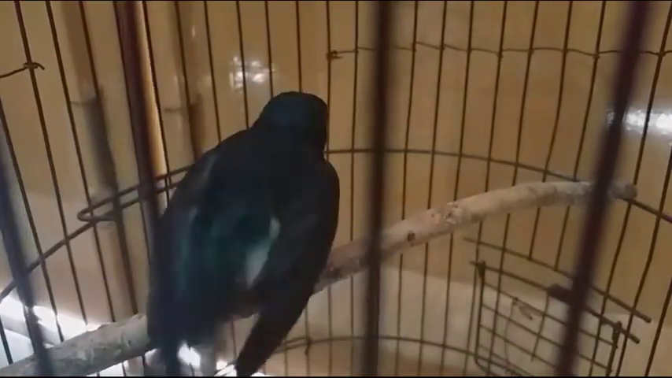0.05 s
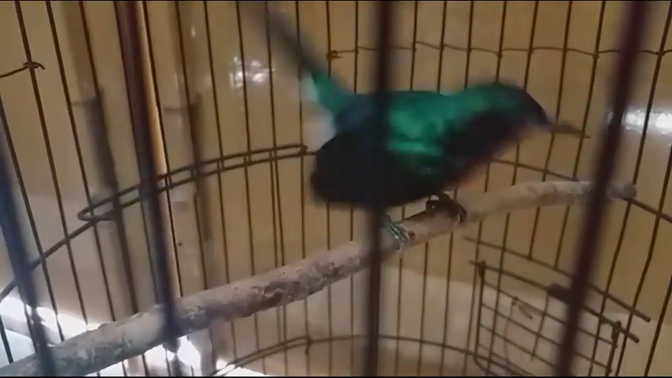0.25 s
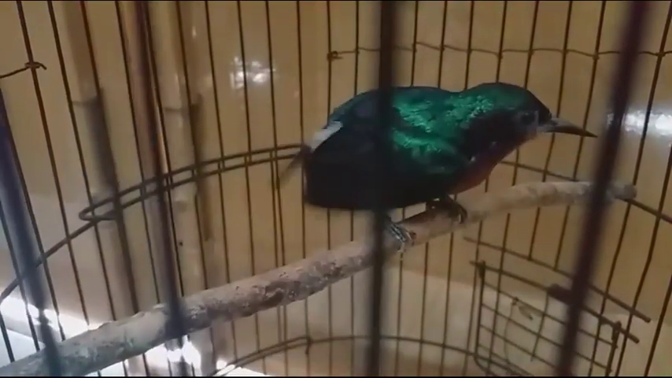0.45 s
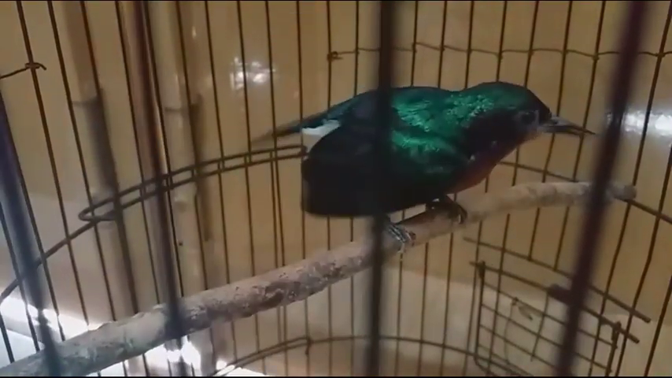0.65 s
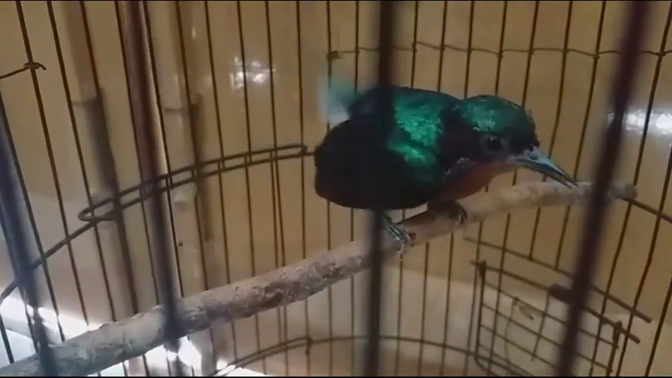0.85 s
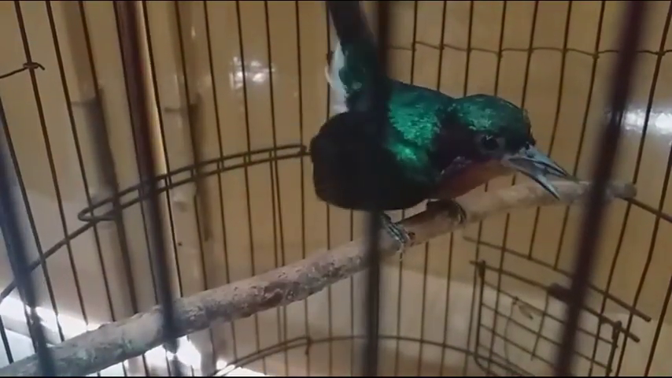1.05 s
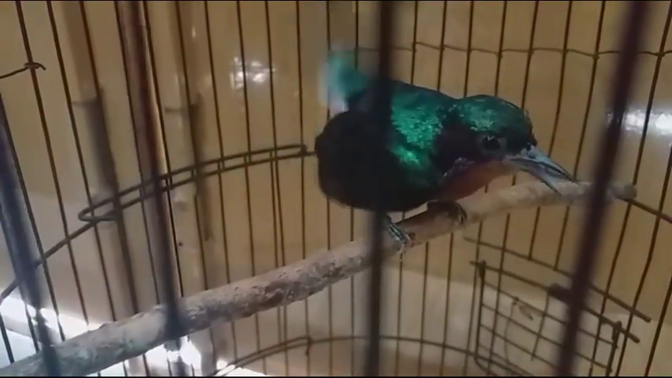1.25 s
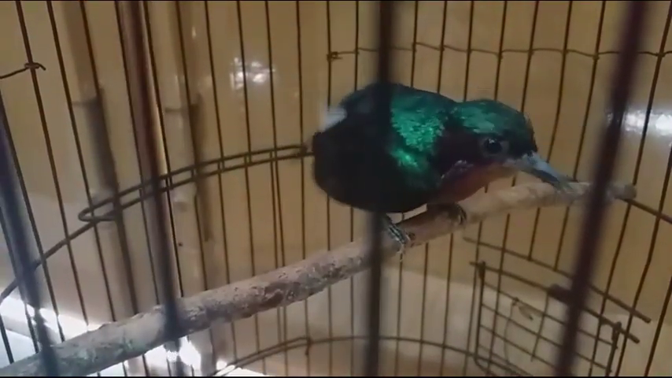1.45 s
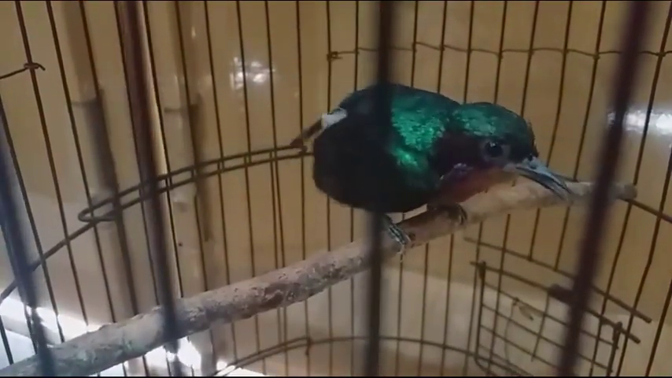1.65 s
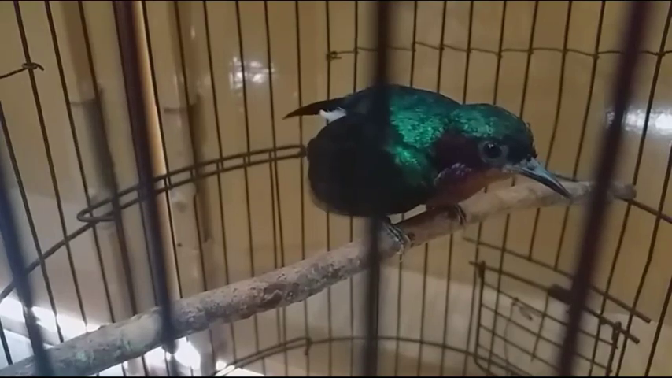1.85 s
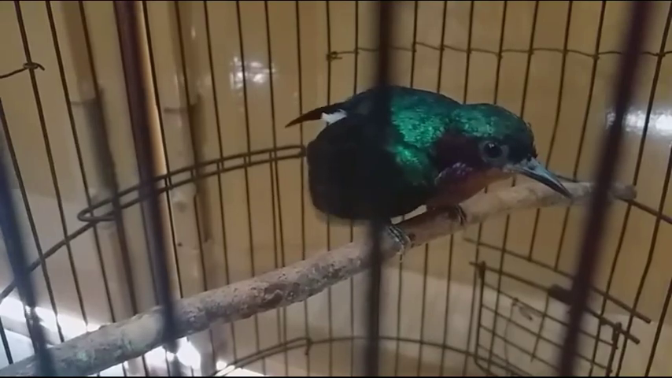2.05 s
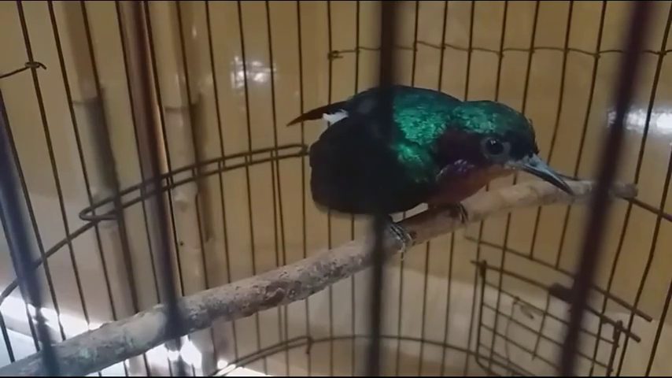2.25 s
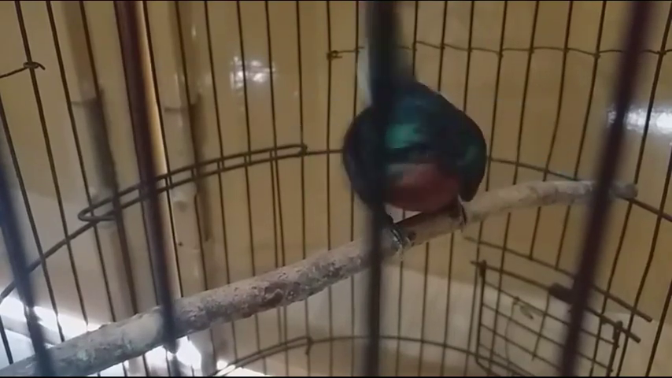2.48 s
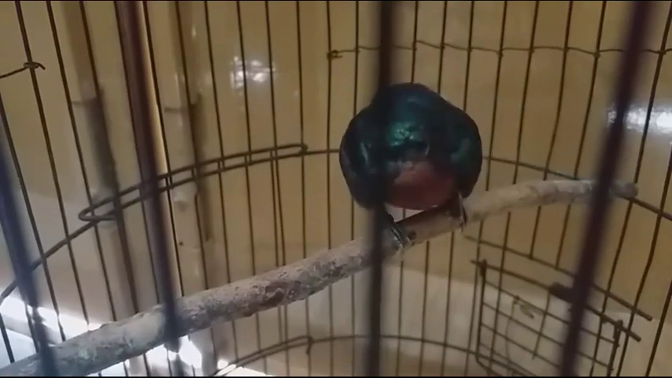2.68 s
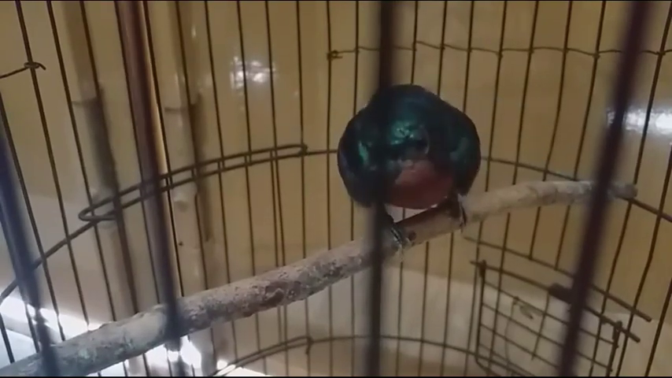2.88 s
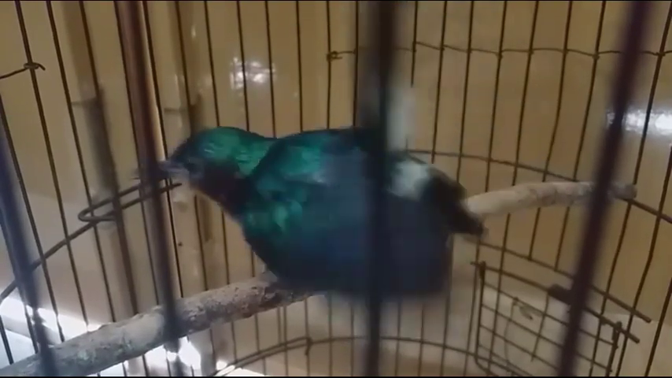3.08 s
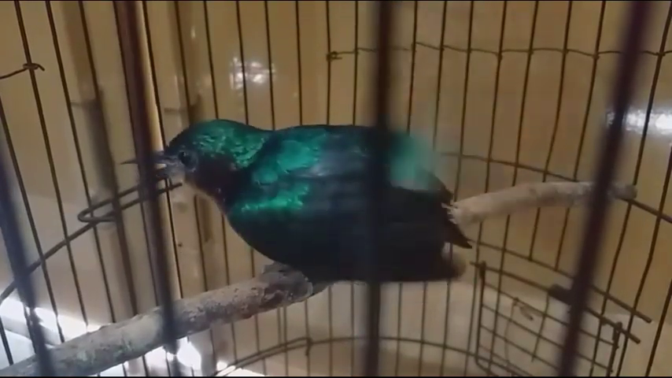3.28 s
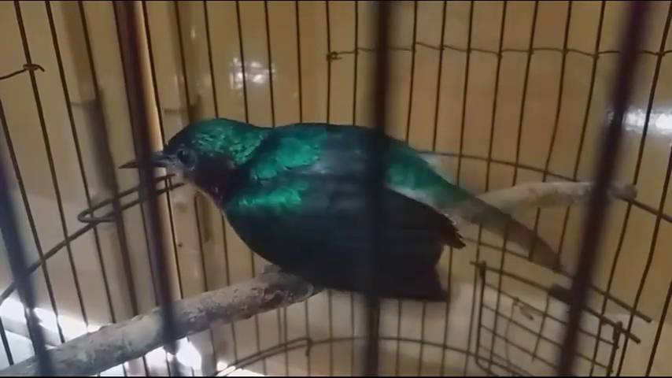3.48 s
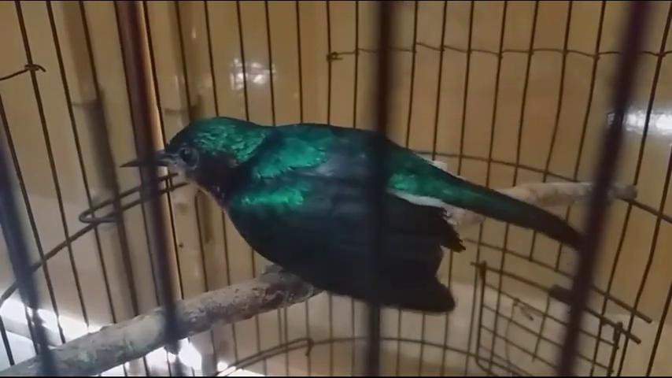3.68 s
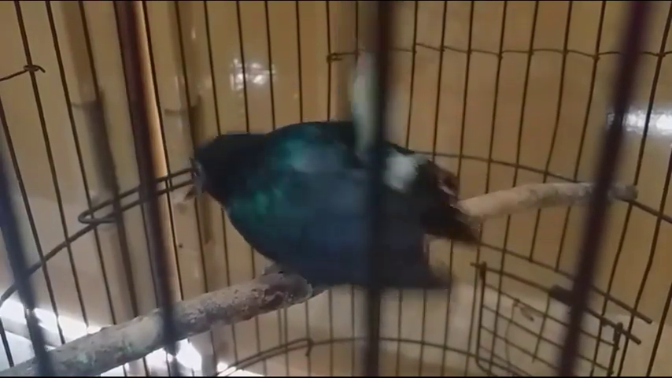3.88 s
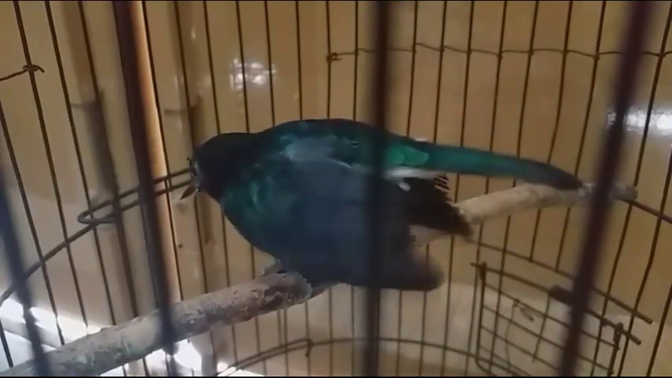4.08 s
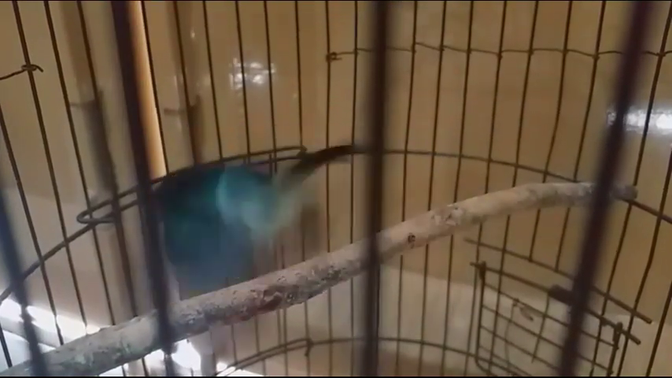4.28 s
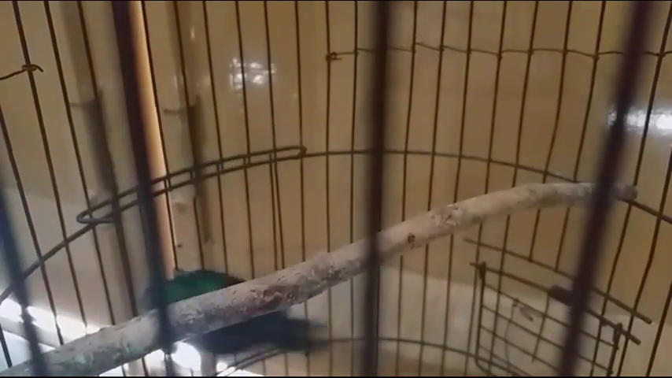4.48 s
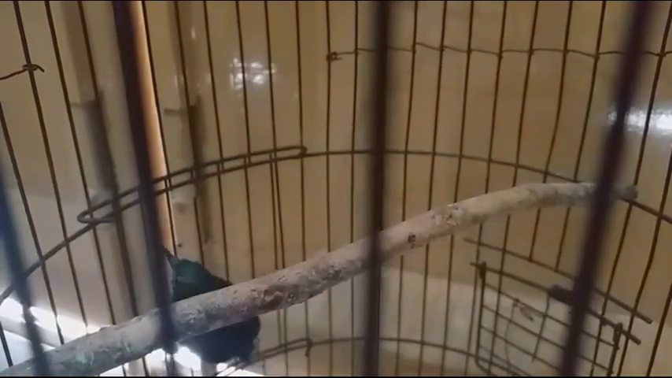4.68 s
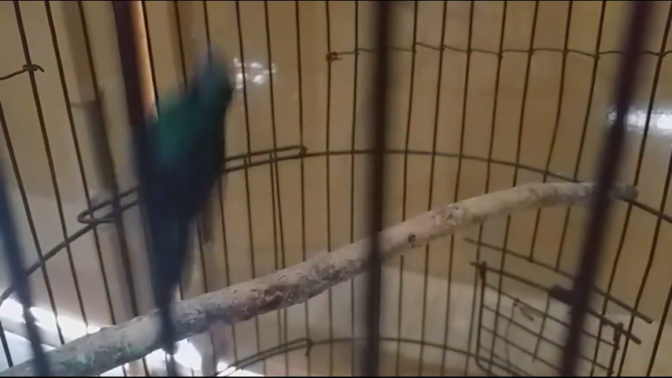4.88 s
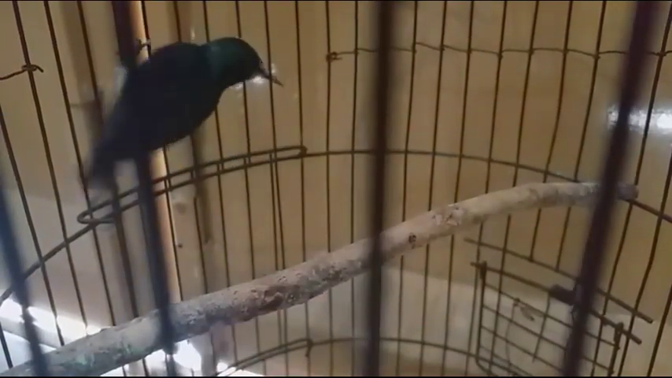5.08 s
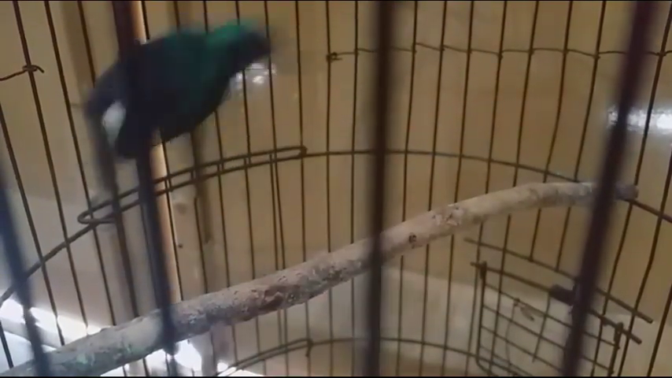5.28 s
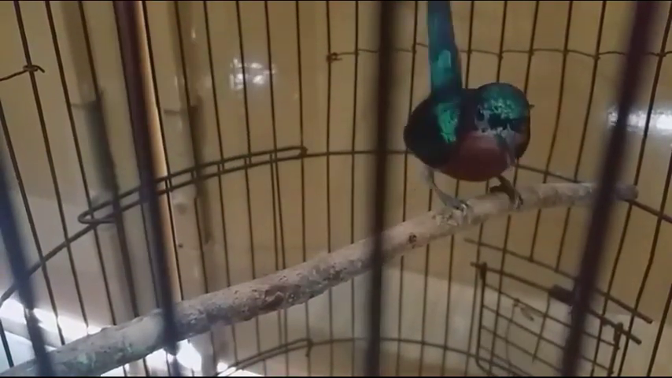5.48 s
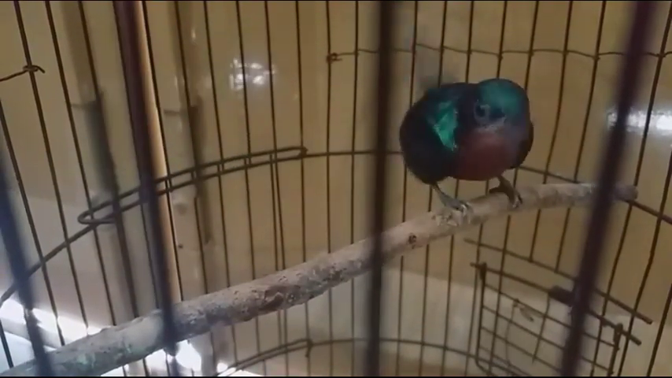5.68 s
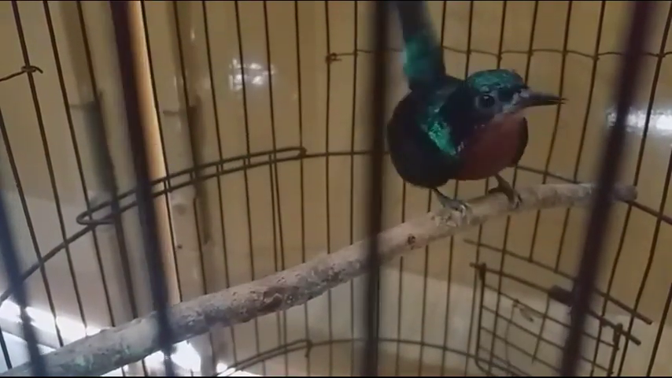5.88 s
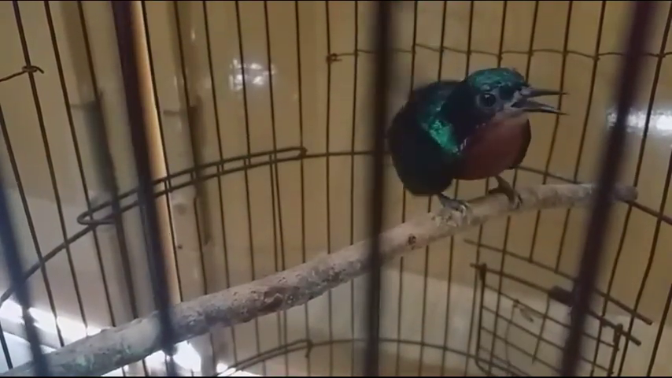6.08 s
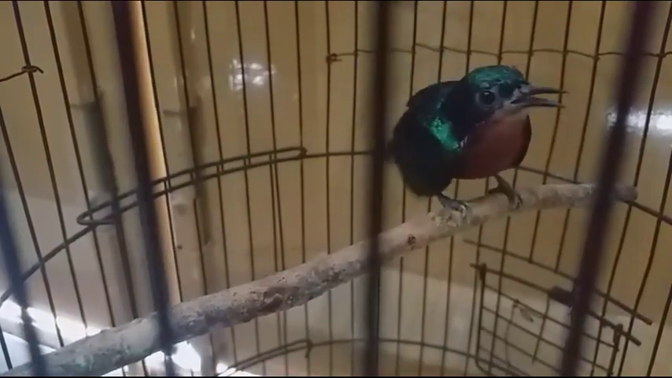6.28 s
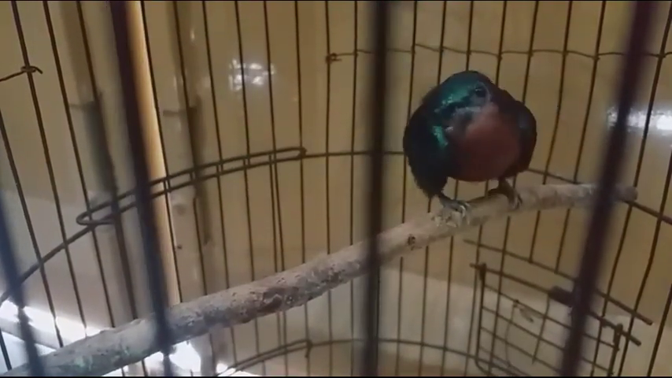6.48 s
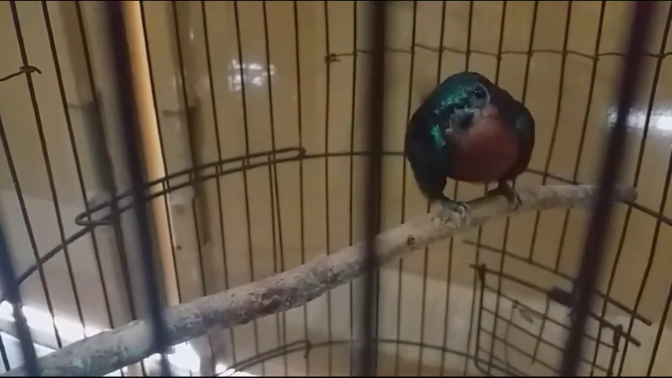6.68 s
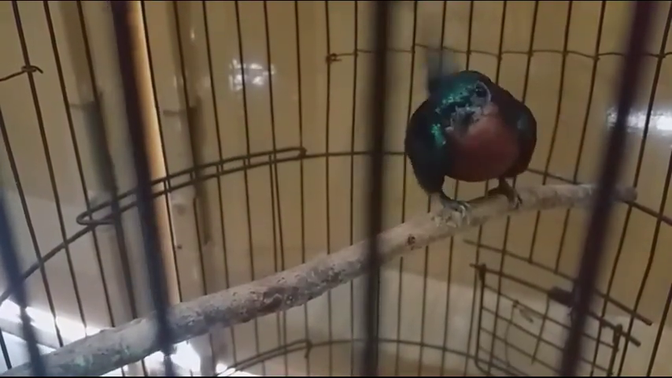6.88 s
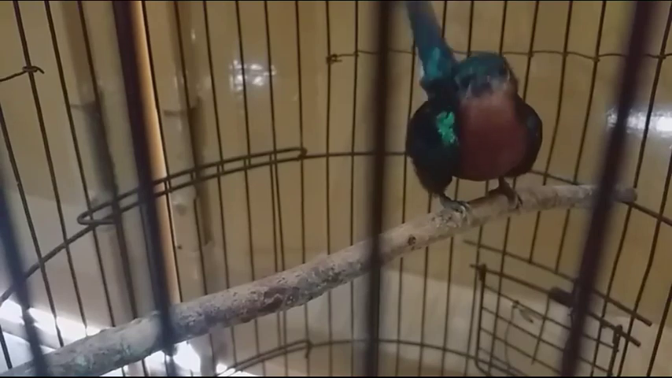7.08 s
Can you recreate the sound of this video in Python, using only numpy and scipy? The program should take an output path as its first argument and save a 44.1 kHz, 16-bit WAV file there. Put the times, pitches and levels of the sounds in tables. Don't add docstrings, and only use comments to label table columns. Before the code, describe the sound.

A small caged bird sings loud, piercing raspy up-chirps and fast falling whistles close up, ringing in a bare room, with claw ticks and wing flutter.

```python
import sys
import numpy as np
from scipy import signal
from scipy.fft import rfft, irfft
from scipy.io import wavfile
from scipy.ndimage import uniform_filter1d, map_coordinates

SR = 44100
rng = np.random.default_rng(int(sys.argv[2]) if len(sys.argv) > 2 else 0)


def wav_record(signal):
    frames = np.transpose(np.atleast_2d(signal))
    bounded = np.clip(frames, -1, 1)
    quanta = np.round(bounded * 32767).astype(np.int16)
    wavfile.write(sys.argv[1], SR, quanta)


def volts(x):
    e = np.asarray(x, float) / 20
    return 10 ** e


N = 314874
TIME = np.arange(N) / SR


def shape(hz, table):
    f, db = np.transpose(table)
    return volts(np.interp(np.log(np.maximum(hz, 1)), np.log(f), db))


def band(x, lo_hz, hi_hz):
    edges = [lo_hz, min(hi_hz, .45 * SR)]
    return signal.sosfilt(signal.butter(3, edges, "band", fs=SR, output="sos"), x)


def unit(x):
    return x / np.sqrt(np.mean(x ** 2))


def walk(rate):
    k = max(int(SR / rate), 1)
    steps = np.repeat(rng.standard_normal(N // k + 1), k)
    return unit(uniform_filter1d(uniform_filter1d(steps, k), k)[:N])


def coloured(table):
    spectrum = rfft(rng.standard_normal(N)) * shape(np.arange(N // 2 + 1) * SR / N, table)
    return unit(irfft(spectrum, N))


def curve(rows, edge_s):
    s, *columns = np.transpose(rows)
    gate = np.clip(np.minimum(TIME - s[0], s[-1] - TIME) / edge_s + 1, 0, 1)
    return gate, [uniform_filter1d(np.interp(TIME, s, c), size=60) for c in columns]


def fade(t, t60):
    return 1000 ** (-t / t60)


# t/s, rise/s, foot f/Hz, top f/Hz, peak level/dB
CHIRPS = [(-0.034, .041, 2600, 6580, -12), (0.748, .025, 4760, 7380, -12), (0.868, .032, 2957, 7370, -7.5),
          (0.963, .032, 2902, 7220, -9.5), (1.032, .044, 3090, 7440, -9.5), (2.983, .017, 4800, 7157, -5.5),
          (3.092, .034, 2938, 6984, -6.5), (3.198, .030, 2500, 7132, -6.5), (3.281, 0.032, 2460, 6516, -9),
          (3.345, .037, 2387, 6667, -9), (4.883, .026, 4700, 7690, -5), (5.422, .029, 4600, 7330, -8),
          (5.548, 0.028, 2752, 7073, -6), (5.652, 0.023, 2741, 7226, -4), (5.73, .032, 2543, 7043, -6.5),
          (5.79, .033, 2765, 6425, -6)]
RASP_DB = [-4.5, -10.5, 0.5, 0, -0.5, -6, 0.5, -0.5, 0.5, -5, -3.5, -1, 3.5, 0, -4, 6]
# t/s, level/dB
SURGES = [(0.033, 6.5), (1.144, 3), (1.279, 3.5), (1.345, 3.5), (1.489, 3.5), (1.72, 1.5), (3.432, 5.5),
          (3.448, 4), (5.896, 5), (6.04, 5), (6.065, 3.5), (6.254, 10.5), (6.495, 8.5), (6.696, 3),
          (6.753, 3)]


def sunbird():
    shiver, breath = walk(1500), band(coloured(THROAT), 3300, 13000)
    wander = 1 + .004 * walk(90)
    run_on_s, release_s, release_db = .035, .003, -18
    song, left = 0, whistles()
    for row, rasp_db in zip(CHIRPS, RASP_DB):
        start, rise = row[:2]
        joined = [w for w in left if 0 < w[0][0] - start - rise < run_on_s]
        left = [w for w in left if w not in joined]
        points = chirp(*row, bool(joined))
        s, hz, db = points[-1]
        ending = joined[0] if joined else [(s + release_s, hz, db + release_db)]
        song = song + note(sorted(points + ending), rasp_db, shiver, breath, wander)
    for points in left:
        song = song + note(points, -72, shiver, breath, wander)
    surge_s, flutter_db = 0.0038, 1.5
    surge_db = sum(db * np.exp(-((TIME - s) / surge_s) ** 2) for s, db in SURGES)
    return song * volts(flutter_db * np.minimum(walk(190), 1) + surge_db)


def chirp(s, rise, foot_hz, top_hz, db, runs_on):
    knee_hz, faster, round_hz, round_s = 4800, 1.6, 239.6, .004
    foot_db, attack_s, opener_hz = -26, .011, 4000
    low = max(knee_hz - foot_hz, 50)
    high = (top_hz - round_hz - knee_hz) / faster
    knee = (rise - round_s) * low / (low + high)
    hold, top_db = (.005, 0) if runs_on or foot_hz > opener_hz else (.001, -9)
    at = np.unique([0, knee, attack_s / 2, attack_s, rise - round_s, rise, rise + hold])
    bends_hz = [foot_hz, foot_hz + low, top_hz - round_hz, top_hz]
    hz = np.interp(at, [0, knee, rise - round_s, rise], bends_hz)
    size_db = db + np.interp(at, [0, attack_s, rise - round_s, rise + hold], [foot_db, 0, 0, top_db])
    return list(zip(s + at, hz, size_db))


STEP = [(0, .88), (.06, 1.12), (.17, .92), (.33, 1), (.41, .8), (.56, .13), (.64, .06), (.93, 0), (1, -.06)]
SLIDE = [(0, 1), (.16, .96), (.42, .56), (.52, .52), (.85, .1), (1, 0)]
HOOK = [(0, 1), (.12, .85), (.36, .15), (.47, 0), (.65, .2), (.85, .35), (1, .35)]
TIP = [(0, 0), (.16, .65), (.5, .6), (.85, .95), (1, 1)]
CLIMB = [(0, 0), (.1, .08), (.42, .8), (.56, 1), (.85, .98), (1, .9)]
SHAPE_DB = [
    [-9, 1, -1, -7, -3, -5.5, -1, -1, -2],
    [-18, -4, -3, -1, -1.5, -10.5],
    [-10, -2.5, 1.5, -8.5, 2.5, -1, -7.5],
    [-4, -4, 1.5, -4.5, -15.5],
    [-3, -2, 1.5, -0.5, -1, -4.5],
]
# t/s, length/s, high f/Hz, low f/Hz, peak level/dB
STEPS = [(6.342, .107, 6590, 5071, -5.5), (6.596, 0.11, 6250, 4857, -6.5)]
SLIDES = [(1.416, .05, 7330, 5857, -4.5), (6.133, .082, 7762, 5483, -4), (6.243, .025, 7840, 6600, -3),
          (6.485, .03, 7716, 6815, -5.5), (7.118, 0.035, 5466, 4670, -12.5)]
HOOKS = [(1.252, .041, 7210, 6492, -1.5), (6.742, .028, 7003, 6152, -6), (6.994, .036, 6123, 5620, -8),
         (7.098, .020, 5900, 5230, -7)]
TIPS = [(1.33, 0.023, 7816, 7040, -7.5), (1.477, 0.036, 6572, 6074, -3.5), (1.709, 0.022, 6286, 5804, -3.5)]
CLIMBS = [(0.017, .053, 7165, 6090, -6), (3.4, .059, 7425, 5540, -4), (5.845, .072, 7177, 4000, -5)]
# t/s, f/Hz, peak level/dB
DIVES = [
    [(1.085, 7200, -3.5), (1.097, 6680, -10), (1.12, 6670, 3.5), (1.135, 6578, -4.5), (1.159, 5960, -4),
     (1.17, 5790, -9.5), (1.194, 5897, -8), (1.207, 6010, -12.5)],
    [(1.58, 6600, -19), (1.589, 7000, -16.5), (1.602, 6785, -7), (1.626, 5318, -10), (1.654, 5016, -8),
     (1.659, 5150, -25.5)],
    [(6.02, 7900, -25.5), (6.028, 7780, -15.5), (6.04, 7310, -2), (6.049, 7080, -19), (6.057, 7100, -15),
     (6.064, 7305, -4.5), (6.071, 7200, -5), (6.076, 7000, -25)],
    [(6.83, 7005, -15), (6.834, 7135, -13), (6.841, 6187, -6), (6.852, 5790, -9.5), (6.869, 5260, -17.5),
     (6.893, 4472, -15.5), (6.912, 4332, -12), (6.938, 4633, -9), (6.959, 4680, -17.5)],
]


def whistles():
    weak_below_hz, weak_db_per_khz = 4900, 12
    kinds = zip((STEP, SLIDE, HOOK, TIP, CLIMB), SHAPE_DB, (STEPS, SLIDES, HOOKS, TIPS, CLIMBS))
    found = list(DIVES)
    for form, levels, rows in kinds:
        for s, length, high, low, db in rows:
            points = []
            for (u, v), point_db in zip(form, levels):
                hz = low + v * (high - low)
                loss_db = weak_db_per_khz * max(weak_below_hz - hz, 0) / 1000
                points.append((s + u * length, hz, db + point_db - loss_db))
            found.append(points)
    return found


# multiple of the pitch, level/dB, share of rasp 0-1
PARTIALS = [(.5, -19.5, 0.84), (1, 2, 0.11), (1.5, 1.5, 0.6), (2, -6.5, 0.17), (2.5, -8, 1), (3, -14, 0.2)]
# f/Hz, level/dB
THROAT = [(1500, -31), (2500, -19.5), (3500, -24), (4500, -6.5), (7000, 4.5), (8300, -18), (9200, -46.5),
          (10500, -28.5), (13000, -17), (15500, -10.5)]


def note(rows, rasp_db, shiver, breath, wander):
    gate, (hz, size) = curve([(s, f, volts(db)) for s, f, db in rows], edge_s=0.002)
    on = gate > 0
    hz, t = (hz * wander)[on], TIME[on] - rows[0][0]
    fade_s, top_hz = .055, 6000
    fading_db = rasp_db - 20 * (t / fade_s) ** 2 - np.maximum(hz - top_hz, 0) / 50
    rasp = np.minimum(volts(fading_db), 3)
    rough = np.minimum(rasp, 1)
    phase = 2 * np.pi * np.cumsum(hz) / SR + (.03 + .25 * rough) * shiver[on]
    tone, power = 0, 0
    for k, db, share in PARTIALS:
        gain = volts(db) * rasp ** share * shape(k * hz, THROAT) * (k * hz < .45 * SR)
        tone = tone + gain * np.sin(k * phase)
        power = power + gain ** 2
    air = volts(-38) + volts(-13) * rough
    out = np.zeros(N)
    out[on] = (gate * size)[on] * (tone / np.sqrt(power) + air * breath[on])
    return out


# from t/s, delay/ms, level/dB
FLOOR = [
    (0, 1.5, -9.5),
    (.5, 1.56, -9.5),
    (2.5, 1.8, -6.5),
    (4.5, 1.4, -3),
    (5.2, 1.96, -8.5),
    (5.98, 1.55, -12.5),
]


def mirrored(x):
    s, ms, db = np.transpose(FLOOR)
    perch = np.maximum(np.searchsorted(s, TIME) - 1, 0)
    echo = map_coordinates(x, [(TIME - ms[perch] / 1000) * SR], order=3)
    return (x + volts(db[perch]) * echo) / np.sqrt(1 + volts(2 * db[perch]))


# t/s, peak level/dB, low knock against it level/dB
HOPS = [
    (4.344, -58, -3),
    (4.3944, -71, 9),
    (4.4551, -47, -17.5),
    (4.5391, -37.5, -39),
    (4.7027, -45, -9.5),
    (4.8849, -49.5, -5),
    (4.9072, -28.5, -24.5),
    (5.1009, -46.5, -27),
    (5.1897, -54.5, -1),
]
# f/Hz, t60/s, level/dB
CAGE = [(827, 0.062, -6.5), (1430, 0.028, -3), (2152, 0.015, -1), (2926, 0.044, -4.5), (3630, 0.017, 8),
        (5200, 0.02, -2)]


def claws():
    out, t = np.zeros(N), np.arange(4000) / SR
    for s, db, low_db in HOPS:
        noise, ring = rng.standard_normal(len(t)), 0
        for f, t60, wire_db in CAGE:
            ring = ring + volts(wire_db) * np.sin(2 * np.pi * (f * t + rng.random())) * fade(t, t60)
        rattle = 0.8 * band(noise, 800, 8500) * np.exp(-t / 0.044)
        crack = 0.31 * noise * np.exp(-t / 0.0089)
        knock = volts(low_db) * 3 * band(noise, 95, 1170) * np.exp(-t / 0.0074)
        first = int(s * SR)
        out[first:first + len(t)] += volts(db - 3) * (0.79 * ring + rattle + crack + knock)
    return out


# loudest t/s, level/dB
WINGS = [
    [(3.05, -58)],
    [(4.6, -58.5), (4.96, -50.5), (5.3, -72.5)],
]
# low f/Hz, high f/Hz
WING_BANDS = [
    (250, 970),
    (750, 3900),
]


def wings():
    rise_db_s, fall_db_s = 109.5, 80
    out = np.zeros(N)
    beats = 1 + 0.5 * np.sin(2 * np.pi * 17 * TIME + 2.3 * walk(5))
    for flaps, (lo, hi) in zip(WINGS, WING_BANDS):
        size = 0
        for s, db in flaps:
            drop_db = np.maximum(rise_db_s * (s - TIME), fall_db_s * (TIME - s))
            size = size + volts(db - drop_db)
        rustle = unit(band(rng.standard_normal(N), lo, hi))
        out += size * volts(0.5) * beats * volts(1.8 * walk(76)) * rustle
    return out


# low f/Hz, high f/Hz, t60/s, level/dB
ROOM = [(60, 340, 2.5, -2), (2700, 6300, 1.17, -20.5), (6000, 10340, 0.97, -18), (10260, 19000, 0.4, -22)]
# delay t/s, level/dB
ECHOES = [
    (.0031, -13),
    (.0078, -14),
    (0.0143, -19),
]


def room(x):
    t = np.arange(2 * SR) / SR
    noise = rng.standard_normal(len(t)) * np.clip((t - .003) / 0.0023, 0, 1)
    ring = 0
    for lo, hi, t60, db in ROOM:
        ring = ring + volts(db + 10.5) * band(noise, lo, hi) * fade(t, t60) / np.sqrt(t60 * SR / 14)
    for s, db in ECHOES:
        ring[int(s * SR)] += volts(db)
    return signal.fftconvolve(x, ring)[:N]


def earlier_song():
    return volts(-28.5) * unit(band(rng.standard_normal(N), 4540, 6770)) * fade(TIME, 1.26)


# t/s, length/s, f/Hz, level/dB
CROWS = [
    (0.25, .5, 655, -80),
    (1.85, 1.05, 680, -66),
    (4.65, .95, 650, -53),
]
# share of length, pitch ratio, level/dB
CROW = [(0, .995, -6), (.14, 1, 0), (.45, .99, -1), (.62, .93, -8), (1, .86, -18)]


def cock():
    out = 0
    for (s, length, pitch_hz, peak_db), overtone_db in zip(CROWS, (-12, -5, -16)):
        rows = [(s + u * length, pitch_hz * ratio, peak_db + d) for u, ratio, d in CROW]
        gate, (hz, db) = curve(rows, edge_s=0.023)
        phase = 2 * np.pi * np.cumsum(hz) / SR
        line = (.7 + .5 * walk(70)) * np.sin(phase) + .5 * walk(70) * np.cos(phase)
        overtone = volts(overtone_db) * walk(350) * np.sin(1.6 * phase)
        hoarse = volts(-4) * walk(200) * np.sin(phase)
        out = out + gate * volts(db) * (line + overtone + hoarse)
    return out


# t/s, end t/s, centre f/Hz, first level/dB, last level/dB
FLOCK = [
    (2.714, 2.94, 4340, -63, -58),
    (3.95, 4.252, 5200, -56.5, -53),
    (4.404, 4.851, 4620, -54.5, -48),
]


def flock():
    sink = .9
    parts = ((.55, -17), (.85, -3.5), (1.05, -0.5), (1.3, -3), (1.55, -15.5), (2.2, -29), (2.7, -33.5))
    out = 0
    for s, end, centre_hz, first_db, last_db in FLOCK:
        rows = [(s, first_db, centre_hz / sink ** .5), (end, last_db, centre_hz * sink ** .5)]
        gate, (db, hz) = curve(rows, edge_s=0.22)
        for spread, part_db in parts:
            phase = 2 * np.pi * np.cumsum(hz * spread) / SR
            out = out + gate * volts(db + part_db + 2 * walk(12)) * walk(1500) * np.sin(phase)
    return out


# f/Hz, level/dB per Hz
HUM = [(25, -21), (60, -11), (115, 4.5), (190, -7), (400, -26), (600, -19.5), (1000, -30), (2000, -35.5),
       (4500, -3.5), (7500, -22), (9300, -47.5), (15000, -35)]


def street_hum():
    return volts(-59.5 + .8 * walk(1.9)) * coloured(HUM)


def scene():
    near = mirrored(sunbird()) + claws() + wings()
    outside = cock() + flock() + street_hum()
    return (near + room(near) + earlier_song() + outside)[None]


def roll_off(x):
    return signal.sosfilt(signal.butter(12, 15870, fs=SR, output="sos"), x)


def record(dry):
    dry = signal.sosfilt(signal.butter(2, 55, "high", fs=SR, output="sos"), dry)
    thump = signal.sosfilt(signal.butter(3, 110, "high", fs=SR, output="sos"), volts(-24) * dry ** 2)
    fast = signal.resample_poly(dry + thump, up=160, down=147, axis=1)
    top = .85
    clipped = np.clip(fast, -top, .97 * top)
    mix = signal.resample_poly(clipped, up=147, down=160, axis=1)[:, :N]
    mix = signal.sosfilt(signal.butter(2, 60, "high", fs=SR, output="sos"), mix)
    mix = signal.sosfilt(signal.ellip(8, .2, 60, 15800, fs=SR, output="sos"), mix)
    return roll_off(mix)


dry = scene()
out = record(dry)
wav_record(out)
```